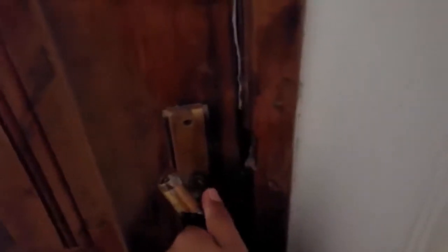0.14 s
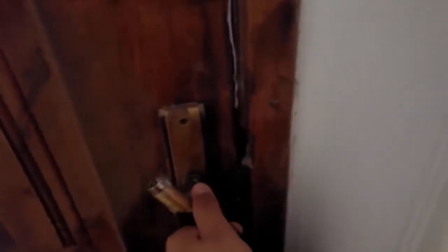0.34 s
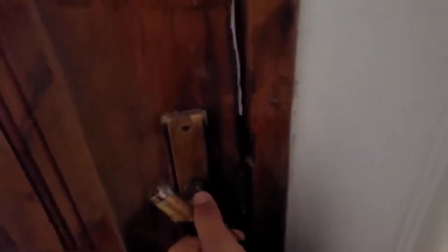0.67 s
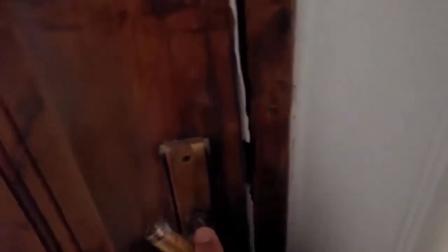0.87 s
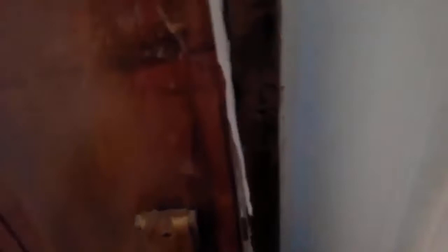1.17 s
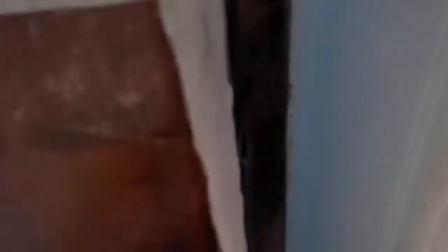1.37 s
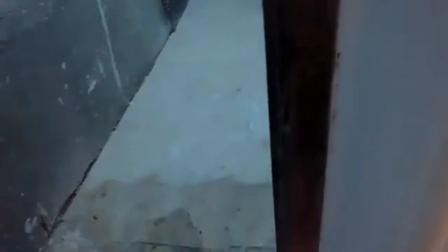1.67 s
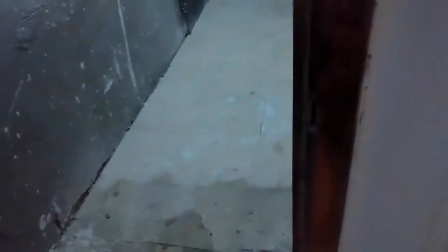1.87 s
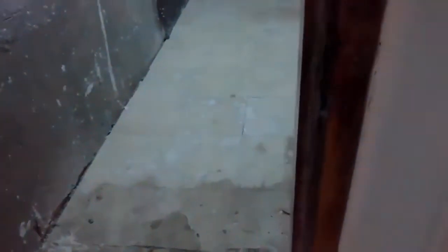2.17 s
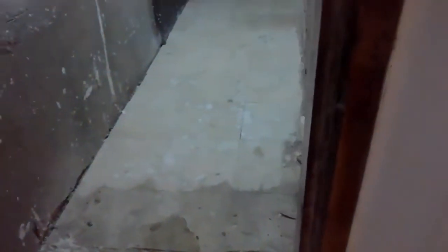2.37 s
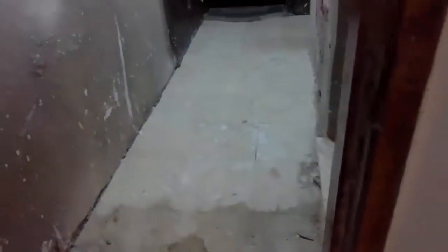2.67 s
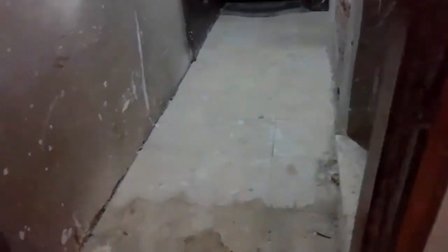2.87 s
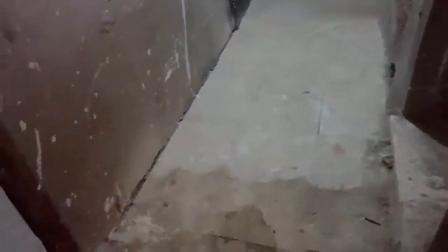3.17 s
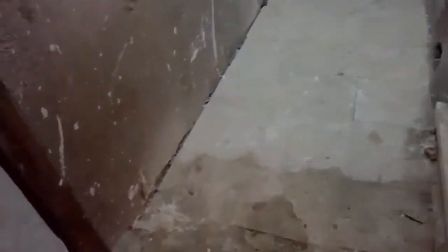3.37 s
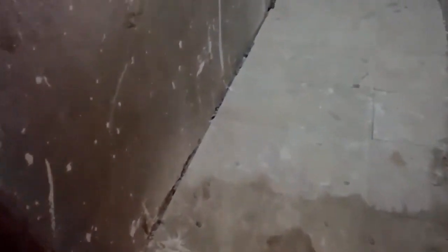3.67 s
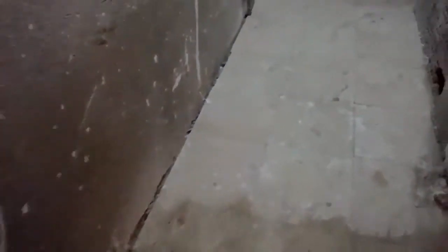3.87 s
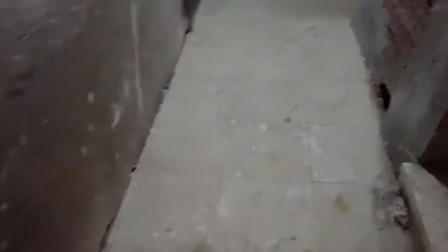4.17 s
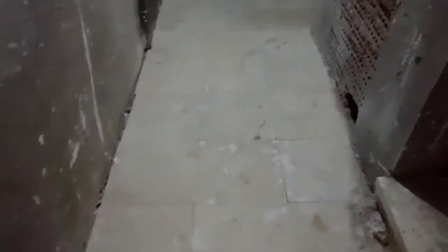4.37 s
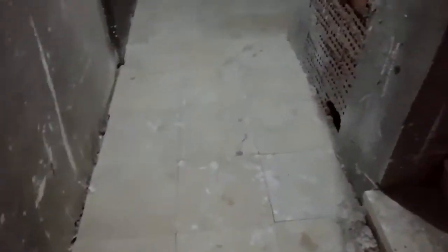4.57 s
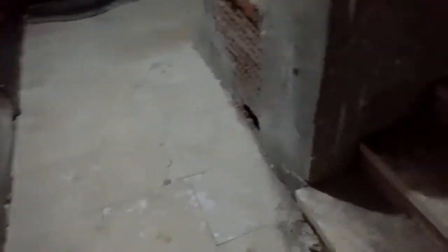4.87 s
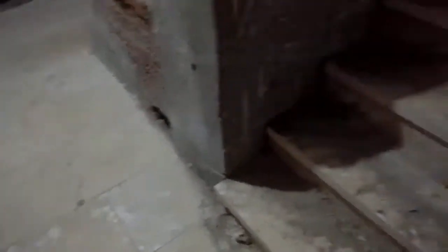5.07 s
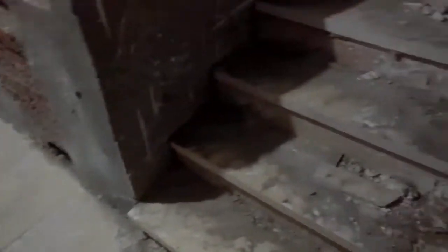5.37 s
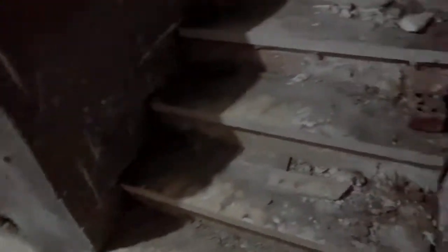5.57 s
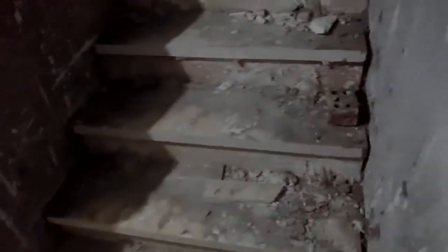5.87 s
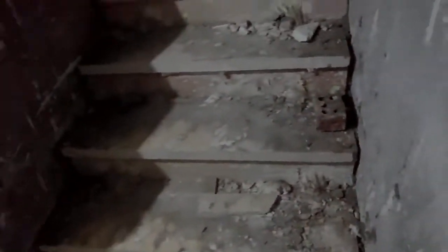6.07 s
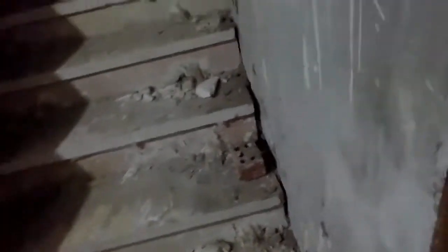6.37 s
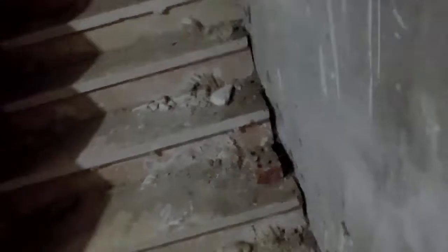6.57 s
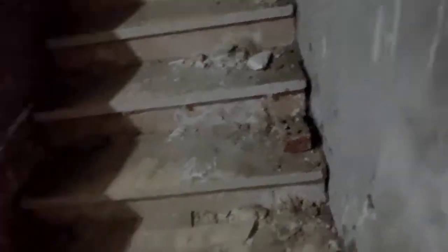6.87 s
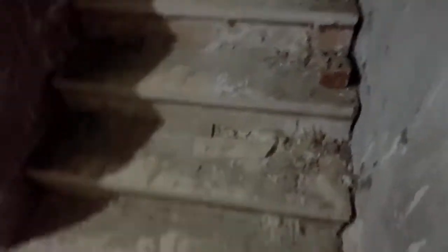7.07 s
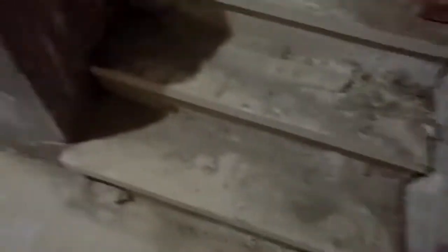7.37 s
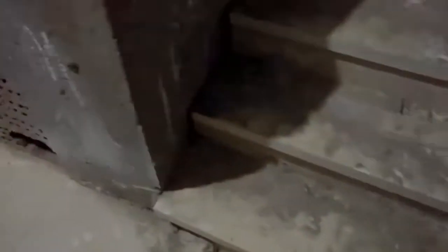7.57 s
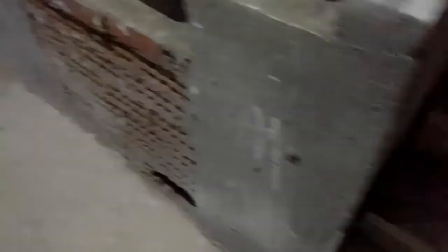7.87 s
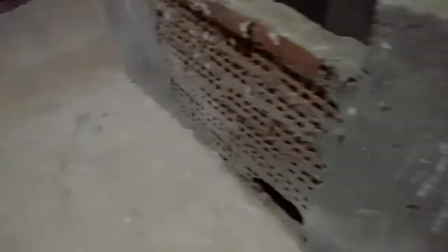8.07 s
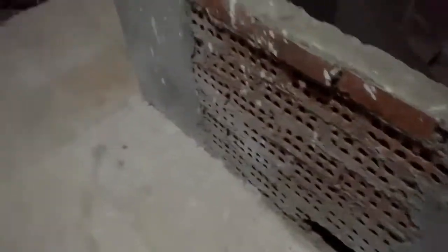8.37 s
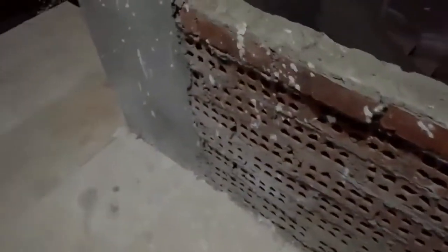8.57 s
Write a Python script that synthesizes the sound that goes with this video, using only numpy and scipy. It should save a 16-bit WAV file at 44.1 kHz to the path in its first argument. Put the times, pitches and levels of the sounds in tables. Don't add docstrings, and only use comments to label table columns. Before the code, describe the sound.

Quiet handling and latch clicks at a wooden door, a bolt springing free, faint gritty footsteps, then one violent slam booming through a concrete stairwell.

```python
import sys
import numpy as np
from scipy import signal
from scipy.fft import rfft, irfft, next_fast_len
from scipy.io import wavfile
from scipy.ndimage import uniform_filter1d

SR = 44100
rng = np.random.default_rng(int(sys.argv[2]) if len(sys.argv) > 2 else 0)


def put_to_file(sound):
    columns = np.atleast_2d(sound).T
    safe = np.clip(columns, -1, 1)
    whole_steps = np.round(safe * 32767)
    wavfile.write(sys.argv[1], SR, whole_steps.astype(np.int16))


def decibels_to_gain(level_db):
    exponent = np.asarray(level_db, float) / 20
    return 10 ** exponent


N = 384852

# pitch [Hz], level [dB], t60 [s].
KNOCK = [(679.6, -6.5, .04), (900, 1.5, .03), (1100, 2.5, 0.027), (1270, 2.5, 0.018), (1460, -3.5, 0.03),
         (1720, -8.5, 0.037)]
DUCK_DB, DUCK_S = -8.5, 6.5


def evened(x):
    return x / np.sqrt(np.mean(x ** 2) + 1e-20)


def read(points, hz):
    f, value = np.transpose(points)
    return np.interp(np.log(hz + 1), np.log(f + 1), value)


def follow(rows, t):
    s, db = np.transpose(rows)
    return np.interp(t, s, db)


def add(mix, s, sound):
    part = mix[..., round(s * SR):][..., :sound.shape[-1]]
    part += sound[..., :part.shape[-1]]


def coloured(x, gain):
    size = next_fast_len(x.shape[-1])
    spectrum = rfft(x, size) * gain(np.fft.rfftfreq(size, 1 / SR))
    return irfft(spectrum, size)[..., :x.shape[-1]]


def arch(t, start, hold, rise, fall):
    return -rise * np.maximum(start - t, 0) - fall * np.maximum(t - start - hold, 0)


def summed(levels_db):
    return 10 * np.log10(sum(decibels_to_gain(db) ** 2 for db in levels_db))


def ring(modes, length_s, rise_s=.002):
    t = np.arange(round(length_s * SR)) / SR
    sines = sum(decibels_to_gain(db - 60 * t / t60) * np.sin(2 * np.pi * hz * t) for hz, db, t60 in modes)
    return (1 - np.exp(-t / rise_s)) * sines


def shifted(modes, spread):
    moves = rng.standard_normal((len(modes), 2))
    return [(hz * (1 + spread * a), db + 2.0 * b, t60) for (hz, db, t60), (a, b) in zip(modes, moves)]


def resonate(x, hz, width_hz):
    turn = np.exp(2j * np.pi * np.cumsum(hz) / SR)
    r = np.exp(-np.pi * width_hz / SR)
    return 2 * (turn * signal.lfilter([1 - r], [1, -r], x / turn)).real


def echoes(decay, length_s):
    size = round(length_s * SR)
    taps = rng.choice([-1., 1.], (2, size)) * (rng.random((2, size)) < .08)
    hz, t, z = signal.stft(taps, SR, nperseg=256)
    tail = signal.istft(z * decibels_to_gain(-60 * t / read(decay, hz)[:, None]), SR, nperseg=256)[1]
    return tail / np.linalg.norm(tail, axis=1, keepdims=True)


def ports(pair, likeness, lean, lag_s):
    like = lambda hz: np.clip(read(likeness, hz), 0, 1)
    late = coloured(pair[0], lambda hz: like(hz) * np.exp(-2j * np.pi * hz * lag_s))
    right = late + coloured(pair[1], lambda hz: np.sqrt(1 - like(hz) ** 2))
    return np.array([coloured(pair[0], lambda hz: decibels_to_gain(read(lean, hz) / 2)),
                     coloured(right, lambda hz: decibels_to_gain(-read(lean, hz) / 2))])


def motor_hum():
    # time [s], second-order level [dB].
    motor_curve = [(0, -67), (.45, -71.5), (1.15, -66), (1.36, -60.5), (1.5, -63), (1.95, -52.5),
                   (2.3, -51.5), (2.45, -67), (3.05, -62.5), (3.55, -73.5), (3.68, -62.5), (4.05, -73),
                   (4.35, -56.5), (4.9, -67), (5.35, -68.5), (6.15, -70), (7.45, -67.5), (8.1, -81)]
    # multiple of shaft rate, level [dB from the fourth].
    upper_orders = [(3, -5), (5, -14), (6, -15), (8, -15)]
    # frequency [Hz], density [dB per Hz].
    rumble_colour = [(8.8, -39.5), (15, -11.5), (49, 0), (75, 0), (119, -12), (274, -18.5), (341, -22.5),
                     (500, -30.5), (650, -60), (1100, -120)]
    # start [s], hold [s], level [dB].
    low_swells = [
        (1.33, 0.068, -57),
        (1.97, .15, -54),
        (2.52, 0.073, -57),
        (3.28, 0.13, -64),
        (3.72, 0.16, -63),
        (7.0, 0.21, -56.5),
        (7.8, .2, -68.5),
        (8.5, .15, -68),
    ]
    # start [s], hold [s], level [dB].
    upper_swells = [
        (.66, 0.071, -74),
        (1.32, 0.053, -64),
        (1.9, 0.1, -66.5),
        (3.62, 0.43, -74),
        (4.2, 0.18, -65),
        (4.58, 0.196, -65.5),
        (5.0, 0.26, -72),
        (6.1, .1, -70),
        (7.0, 0.03, -63),
    ]
    t = np.arange(N) / SR
    steps = np.arange(N // 256 + 2) * 256 / SR

    def swelling(rows):
        level_db = summed([db + arch(steps, s, hold, 150, 80) for s, hold, db in rows])
        return np.interp(t, steps, level_db)

    second_db = follow(motor_curve, t)
    first_db = summed([-68.5 + .45 * (second_db + 64.5), swelling(low_swells)])
    fourth_db = summed([-78 + .5 * DUCK_DB * (t > DUCK_S), swelling(upper_swells)])
    orders = [(1, first_db), (2, second_db), (4, fourth_db)]
    orders += [(k, .5 * (fourth_db + 75.0) - 74.0 + db) for k, db in upper_orders]

    shaft_hz = 38 - .4 * t
    angle = 2 * np.pi * np.cumsum(shaft_hz) / SR
    lines = np.zeros(N)
    for k, db in orders:
        knots = rng.standard_normal(N // 2048 + 2)
        waver_db = 2.0 + 2.0 * np.interp(t, np.arange(len(knots)) * 2048 / SR, knots)
        lines += decibels_to_gain(db + waver_db) * np.sin(k * angle + k * k)
    rumble = evened(coloured(rng.standard_normal(N), lambda hz: decibels_to_gain(read(rumble_colour, hz))))
    return lines + decibels_to_gain(-68 + 0.65 * (second_db + 65.0)) * rumble


def scuff_power(hz, t):
    # start [s], hold [s], level [dB], dull rub [dB above level], fine grit [dB above level].
    hand = [
        (.07, 0.15, -57, -8, -6.5),
        (.28, 0.099, -62.5, -8, -5),
        (.65, 0.11, -53, -10.5, -1.5),
        (.79, .16, -57, -6, -2.5),
        (1.0, 0.217, -60.5, -15.5, -5.5),
        (1.3, 0.035, -52, -14, -12),
    ]
    swing = [
        (1.4, .21, -56, -22, -5.5),
        (1.7, 0.16, -54.5, -12.5, -2),
        (1.93, 0.44, -55, -23, -5),
        (2.46, 0.224, -57.5, -21.5, -4),
        (2.79, 0.11, -65.5, -14, -4),
    ]
    soles = [(3.04, .06, -64.5, -8.5, -1.5), (3.17, .13, -68.5, -4.5, -3), (3.56, .07, -73.5, -1, -0.5),
             (3.67, .06, -67, -6, 0.5), (3.8, .06, -69.5, -7, 3.5), (4.245, .085, -55.5, -9, -2),
             (4.38, .07, -56, -5.5, -5), (4.5, .1, -65, -29, -3.5), (4.88, .04, -66, -7, 2),
             (4.985, 0.045, -59, -3.5, -2), (5.07, 0.093, -66, -13, -5), (7.31, .14, -77, -13, 1),
             (7.45, .05, -68, -10, -1), (7.515, .055, -58.5, -10.5, -3), (7.6, 0.27, -64.5, -9, -3.5),
             (7.86, 0.202, -68.5, -9, -3), (8.1, 0.048, -64, -18, -2), (8.2, 0.051, -74.5, -9.5, -4.5),
             (8.31, .04, -80, -7, 6), (8.47, .02, -79.5, -13.5, -7), (8.66, .07, -80, -2, -1)]
    squeeze = [
        (5.22, .3, -73, -4, 9),
        (5.57, 0.36, -67, -6.5, 6),
        (5.97, .24, -69, -6.5, 5),
        (6.245, .055, -52.5, -3.5, 1),
    ]
    # start [s], hold [s], level [dB].
    fine_hiss = [(.35, .02, -70), (.7, .07, -57), (1.19, .03, -71), (1.73, .13, -67), (2.52, .09, -69),
                 (3.06, .07, -76), (3.26, .06, -82), (3.58, .16, -78), (4.86, .06, -77), (5.27, .26, -69),
                 (5.81, .08, -72), (6.14, .08, -76), (7.3, .12, -81), (7.43, .2, -74), (8.09, .07, -79)]
    bands = [[(600, 1), (1100, 0)],
             [(600, 0), (1100, 1), (2600, 1), (4200, 0)],
             [(2600, 0), (4200, 1), (7500, 1), (10500, 0)],
             [(7500, 0), (10500, 1)]]
    shares = np.array([read(band, hz) for band in bands])
    air_share = shares[3][:, None]

    def tilt(dull_db, grit_db, air_db):
        return (shares.T @ [dull_db + 11.0, 0, grit_db + 0.5, air_db + 8.5])[:, None]

    still_db = -74 + DUCK_DB * (t > DUCK_S)
    power = decibels_to_gain(tilt(-4, -6.5, -10.5)) ** 2 * decibels_to_gain(still_db) ** 2
    for strokes, rise, fall, air_db in [(hand, 140, 190, -7), (swing, 110, 72, -10),
                                        (soles, 230, 190, -7.5), (squeeze, 260, 90, -9)]:
        for s, hold, db, dull_db, grit_db in strokes:
            envelope = decibels_to_gain(db + arch(t, s, hold, rise, fall))
            power = power + decibels_to_gain(tilt(dull_db, grit_db, grit_db + air_db)) ** 2 * envelope ** 2
    for s, hold, db in fine_hiss:
        power += air_share ** 2 * decibels_to_gain(db + 11.0 + arch(t, s, hold, 400, 300)) ** 2
    return power, air_share


def scuff():
    # frequency [Hz], density [dB per Hz].
    scuff_colour = [(100, -33.5), (170, -3.5), (383, -10), (560, -7.5), (915, 0), (1040, -1.5), (1190, -1),
                    (1550, -4), (2310, -1), (2740, -2.5), (4920, -5), (8520, -11.5), (11500, -15),
                    (15600, -19.5)]
    grains = decibels_to_gain(4.4 * np.minimum(rng.exponential(1, N), 3.6)) * (rng.random(N) < 500 / SR)
    drive = rng.standard_normal((2, N)) * (1 + 0.11 * evened(uniform_filter1d(grains, 24)))
    hz, t, z = signal.stft(drive, SR, nperseg=512)
    power, air_share = scuff_power(hz, t)

    noise = lambda: rng.standard_normal(z.shape[1:])
    patches = evened(uniform_filter1d(uniform_filter1d(noise(), 8, 0), 5, 1))
    flicker = evened(uniform_filter1d(noise(), 90, 0))
    sparkle = evened(uniform_filter1d(noise(), 6, 1))
    level_db = 10 * np.log10(power) + 2.0 * patches + 1.2 * flicker + 1.5 * sparkle
    gate_db = -73
    level_db += .35 * air_share * np.minimum(uniform_filter1d(level_db, 12, 0) - gate_db, 0)

    shape = decibels_to_gain(read(scuff_colour, hz))
    shape /= np.sqrt(np.sum(shape[(hz > 900) & (hz < 3000)] ** 2) / len(hz))
    out = signal.istft(z * shape[:, None] * decibels_to_gain(level_db), SR, nperseg=512)[1][:, :N]
    return out * np.interp(np.arange(N) / SR, [6.3, 6.35, 6.45, 6.55], [1, 0, 0, 1])


def grit_snaps():
    # time [s], peak [dB].
    grit_rows = [(0.0324, -55), (0.1524, -50), (0.2024, -51), (0.2797, -49), (0.5256, -62), (0.9217, -45),
                 (0.9544, -51), (1.038, -54), (3.3138, -59), (3.413, -62), (3.444, -65), (3.5941, -57),
                 (4.1439, -62), (4.9654, -49), (5.1835, -52), (7.0292, -77), (7.3075, -62), (7.3562, -57),
                 (7.3644, -59), (7.3918, -54), (7.4068, -51), (7.4771, -50), (7.775, -57), (7.96, -58),
                 (8.204, -59), (8.2843, -62), (8.2993, -58), (8.3073, -57), (8.3404, -63)]
    out, t = np.zeros(N), np.arange(600) / SR
    for s, db in grit_rows:
        snap = rng.standard_normal(601)
        add(out, s, decibels_to_gain(db + 1.5) * (snap[1:] - .6 * snap[:-1]) * decibels_to_gain(-60 * t / .005))
    return out


def latch_ticks():
    # time [s], peak [dB], ring [Hz], low knock [dB].
    tick_rows = [(0.0665, -42, 3310, -53), (0.0942, -45, 2930, -46), (0.134, -47, 3550, -47),
                 (0.2546, -49, 3070, -52), (0.3105, -47, 3770, -69), (0.357, -45, 2830, -50),
                 (0.5845, -44.5, 6300, -73), (0.597, -48, 3670, -70), (0.633, -46, 2620, -71),
                 (0.691, -40, 4000, -69), (0.706, -39, 4100, -61), (0.724, -39, 4350, -66),
                 (0.8092, -46, 3300, -55), (0.836, -39.5, 2600, -64), (0.8758, -43.5, 3230, -44),
                 (0.94, -41, 4700, -42.5), (3.0396, -52.5, 2660, -60), (3.695, -49, 6030, -71),
                 (3.8317, -47.5, 4170, -62), (4.4023, -45, 3540, -53), (4.414, -42, 3540, -70),
                 (4.9776, -46, 5270, -40), (7.5494, -49, 4293, -45), (8.107, -51, 3870, -76)]
    out, t = np.zeros(N), np.arange(600) / SR
    for s, db, hz, knock_db in tick_rows:
        snap = rng.standard_normal(600) * decibels_to_gain(-60 * t / 0.0098)
        metal = ring([(hz, 0, .008), (0.92 * hz, -3, .006)], 600 / SR, 0.00014)
        add(out, s, decibels_to_gain(db) * (snap + 0.54 * metal))
        add(out, s, decibels_to_gain(knock_db - 7.0) * ring(shifted(KNOCK, 0.065), .05, 0.00091))
    return out


def whistles():
    # start [s], hold [s], level
    # [dB], first pitch [Hz], width [Hz].
    note_rows = [(0.459, 0.06, -68, 207, 70), (.72, 0.16, -68, 242, 50), (4.982, .03, -55.5, 820, 350),
                 (5.0, .04, -61, 1250, 300), (5.06, .07, -68, 1400, 200), (4.875, .06, -66, 1150, 300),
                 (1.395, 0.02, -53.5, 1150, 130), (1.43, 0.023, -57, 1164, 130),
                 (1.431, 0.027, -66, 2280, 250), (2.62, .28, -68, 2320, 150),
                 (2.78, 0.34, -68.5, 1234, 200), (3.031, 0.044, -68, 2690, 150),
                 (4.2, 0.2, -65, 2000, 200), (4.14, .05, -71, 2060, 200), (4.568, .03, -67, 1720, 180),
                 (5.18, .015, -64, 7900, 1500), (5.266, 0.13, -57.5, 8700, 890),
                 (5.314, 0.11, -58.5, 7360, 1300), (5.42, .04, -59, 8300, 1800),
                 (5.53, 0.072, -62, 5800, 1200), (5.42, 0.09, -59.5, 4260, 380),
                 (5.521, 0.086, -58, 4080, 380), (5.66, 0.042, -67, 4100, 330),
                 (5.554, 0.056, -58, 1960, 100), (5.621, 0.12, -60, 2015, 260),
                 (5.761, 0.29, -64.5, 2060, 220), (6.085, 0.06, -68, 1935, 60),
                 (5.63, 0.09, -58, 2300, 160),
                 (7.621, .5, -71, 1300, 500), (5.66, .02, -66, 300, 50), (5.715, 0.035, -57, 295, 30),
                 (5.808, 0.046, -58, 313, 30), (5.89, 0.07, -60, 315, 35), (6.01, .03, -61, 310, 30),
                 (6.07, 0.1, -59, 313, 25), (6.249, .03, -55.5, 320, 60), (6.245, .03, -58.5, 1000, 250),
                 (6.619, .17, -82, 4000, 600), (1.332, .07, -62, 2700, 200), (3.35, 0.17, -76, 1140, 200),
                 (3.901, .15, -75, 1160, 150), (5.72, 0.19, -69, 190, 60), (5.804, 0.47, -68, 700, 200),
                 (7.616, 0.098, -73.5, 372, 50), (8.55, .12, -76, 190, 70)]
    out = np.zeros((2, N))
    for s, hold, db, first_hz, width_hz in note_rows:
        t = np.arange(SR // 2) / SR + s - .05
        sink_hz_per_s = 60 * (first_hz / 1000) ** 2
        hz = first_hz - sink_hz_per_s * np.clip(t - s, 0, hold)
        air = [evened(resonate(resonate(n, hz, width_hz), hz, width_hz))
               for n in rng.standard_normal((2, len(t)))]
        add(out, t[0], decibels_to_gain(db + arch(t, s, hold, 700, 130)) * np.array(air))
    return out


def bolt_release():
    # time [s], metal [dB], wood [dB].
    release_rows = [
        (1.272, -51, -60),
        (1.283, -50, -58),
        (1.2901, -37, -47),
        (1.2935, -39, -47),
        (1.297, -39, -42),
        (1.302, -38, -45),
        (1.311, -40, -36),
        (1.32, -46, -41),
    ]
    # pitch [Hz], level [dB], t60 [s].
    bolt_modes = [(2050, -1, 0.018), (2700, 3, 0.018), (3150, -0.5, 0.011), (3750, -3, 0.016),
                  (4640, -2.5, 0.01), (5620, -1, 0.011), (6600, -9, 0.011), (8350, -2, .008)]
    out = np.zeros(N)
    for s, metal_db, wood_db in release_rows:
        add(out, s, decibels_to_gain(metal_db) * ring(shifted(bolt_modes, 0.03), .1, 0.00074))
        add(out, s, decibels_to_gain(wood_db + 1.5) * ring(KNOCK, .1, 0.0024))
    return out


def thuds():
    # time [s], thud [dB], knock [dB].
    thud_rows = [
        (1.299, -49, -41),
        (1.338, -44.5, -56),
        (4.257, -54, -62),
        (4.42, -58, -49),
        (4.977, -56, -44),
        (7.551, -61, -60),
        (7.66, -73, -70),
    ]
    # pitch [Hz], level [dB], t60 [s].
    thump_modes = [(150, 0, .1), (185, 0, .09), (235, 0, .08), (300, -5, .06), (420, -5, .06)]
    # pitch [Hz], level [dB], t60 [s].
    heel_modes = [(640, -52, .03), (790, -47, .04), (930, -48, .035)]
    out = np.zeros(N)
    for s, thud_db, knock_db in thud_rows:
        add(out, s, decibels_to_gain(thud_db - 1.0) * ring(shifted(thump_modes, 0.06), .2, 0.0077))
        add(out, s, decibels_to_gain(knock_db - 7.0) * ring(shifted(KNOCK, 0.13), .2, 0.0036))
    add(out, 4.9765, ring(heel_modes, .1, .001))
    return out


def door_blows():
    # time [s], crack [dB], panel [dB], knock [dB].
    blow_rows = [(6.2866, -30, -55, -23), (6.296, -22, -48, -22), (6.304, -25, -42, -27),
                 (6.316, -22, -30, -17), (6.328, -16.5, -22, -14), (6.3655, -21.5, -11.5, -17.5),
                 (6.372, -25.5, -7, -16), (6.379, -26, -16, -23), (6.394, -22, -26.5, -26),
                 (6.4186, -27.5, -22.5, -8.5), (6.429, -36.5, -15, -16), (6.446, -36, -18, -18),
                 (6.458, -43, -16.5, -29.5), (6.486, -46, -18.5, -35)]
    # frequency [Hz], density [dB per Hz].
    crack_colour = [(180, -27), (300, -2), (469, -11), (509, -0.5), (745, -6.5), (1130, -5), (1400, -12),
                    (1980, -8), (2530, -15.5), (2990, -15), (15600, -37)]
    # pitch [Hz], level [dB], t60 [s].
    panel_modes = [(166.5, 2.5, 0.052), (223.6, -1.5, 0.073), (265.4, -5.5, 0.12), (333, -1.5, 0.063),
                   (412, -5.5, 0.1), (512, -0.5, 0.065), (600, -4, .045)]
    door, knocks, t = np.zeros((2, N)), np.zeros(N), np.arange(3000) / SR
    for s, crack_db, panel_db, knock_db in blow_rows:
        burst = rng.standard_normal((2, 3000)) * decibels_to_gain(-60 * t / 0.078) * (1 - np.exp(-t / .0015))
        add(door, s, decibels_to_gain(crack_db + 8) * coloured(burst, lambda hz: decibels_to_gain(read(crack_colour, hz) + 14)))
        add(door, s, decibels_to_gain(panel_db) * ring(panel_modes, .3, .003))
        add(knocks, s, decibels_to_gain(knock_db - 4.5) * ring(shifted(KNOCK, 0.03), .3, .0008))
    return door, knocks


def stairwell_boom():
    # time [s], deep boom [dB], upper drone [dB], air push [dB].
    pump_rows = [
        (6.3666, -16.5, -12.5, -15),
        (6.385, -30.5, -19.5, -36.5),
        (6.441, -20, -26.5, -36),
        (6.486, -29.5, -24.5, -35.5),
    ]
    # pitch [Hz], level [dB], t60 [s].
    boom_modes = [(55, -4, 2), (56.6, -3.5, 0.54), (86, 0.5, 0.68), (96.96, -4, .42)]
    drone_modes = [(108, -19, .55), (124, -18, 0.6), (143.3, -8, .6), (153.8, -6, .6), (160.9, -3, 0.64),
                   (172.3, -7, .55), (188, -10, .8), (202, -12, 1), (226, -11, .55), (247, -16, .6),
                   (269, -16, 0.72), (300, -24, .5), (337, -24, 0.5)]
    leaf_modes = [(163, 0, 0.077)]
    # time [s], level [dB].
    flex_rows = [
        (6.303, -18),
        (6.311, -8.5),
        (6.318, -4.5),
    ]
    boom = np.zeros(N)
    for s, boom_db, drone_db, push_db in pump_rows:
        add(boom, s, decibels_to_gain(drone_db) * ring(drone_modes, 1.6, .006))
        add(boom, s, decibels_to_gain(boom_db) * ring(boom_modes, 1.6, 0.0033))
        add(boom, s, -decibels_to_gain(push_db) * ring([(30, 0.0031, .15)], 1.6, .006))
    add(boom, 6.604, decibels_to_gain(-25) * ring(boom_modes[:1], 1.6, .02))
    for s, db in flex_rows:
        add(boom, s, decibels_to_gain(db) * ring(leaf_modes, 0.33, 0.0036))
    return boom


def slam():
    # frequency [Hz], t60 [s].
    stairwell_decay = [(100, 1.7), (250, 0.62), (500, 0.61), (1100, 0.84), (1500, .74), (1950, 0.62),
                       (3000, 0.53), (12000, .46)]
    # frequency [Hz], level [dB].
    wet = [(150, -6), (400, -7.5), (800, -2), (1350, -4), (2500, -5), (12000, -8.5)]
    # time [s], gain [dB].
    shut_curve = [
        (6.6, 1.5),
        (6.8, -1),
        (6.88, -4.5),
        (6.93, -11),
        (7.15, -19),
        (7.5, -37),
    ]
    # frequency [Hz], likeness [0 to 1].
    slam_likeness = [(60, 0.98), (200, .93), (350, .6), (550, .2), (1200, 0.56), (2500, .25), (8000, .18)]
    # frequency [Hz], left minus right [dB].
    slam_lean = [(60, -1.5), (180, 2), (550, -2), (1650, 2), (4970, 5.5), (15000, 6)]
    door, knocks = door_blows()
    boom = stairwell_boom()
    start = round(6.2 * SR)
    to_walls = (door + decibels_to_gain(-13.5) * knocks + decibels_to_gain(-13.5) * boom)[:, start:start + SR]
    room = np.zeros((2, N))
    add(room, start / SR, signal.fftconvolve(to_walls, echoes(stairwell_decay, 1.2), axes=1))
    room = coloured(room, lambda hz: decibels_to_gain(read(wet, hz)))
    shut = decibels_to_gain(follow(shut_curve, np.arange(N) / SR))
    return -shut * (ports(door + knocks + room, slam_likeness, slam_lean, .00069) + boom)


def latch_rattle():
    # time [s], peak [dB], ring [Hz].
    rattle_rows = [
        (6.551, -48.5, 3300),
        (6.5588, -37, 3280),
        (6.5678, -38.5, 4960),
        (6.595, -50.5, 2507),
        (6.6315, -46, 6700),
        (6.701, -52, 4480),
        (6.724, -62, 3510),
        (6.752, -62, 2600),
        (6.9468, -71.5, 2980),
    ]
    # pitch [Hz], level [dB], t60 [s].
    latch_modes = [(3360, -4, .01), (4140, -1.5, 0.014), (4970, -15, .01), (6670, -1, 0.007),
                   (8000, -5, 0.007)]
    out, t = np.zeros(N), np.arange(600) / SR
    for s, db, hz in rattle_rows:
        snap = rng.standard_normal(600) * decibels_to_gain(-60 * t / 0.0086)
        add(out, s, decibels_to_gain(db - 4.5) * (ring([(hz, -3, .012)], 600 / SR, 0.0003) + 1.1 * snap))
        add(out, s, decibels_to_gain(db - 2.5) * ring(latch_modes, .4, .00025))
        add(out, s, decibels_to_gain(db + 2.5) * ring(shifted(KNOCK, 0.064), .4, .001))
    return out


def clicks():
    # frequency [Hz], gain [dB].
    tick_colour = [(500, -1), (2000, -1), (5000, 1), (9000, -8), (13000, -5), (16000, -22)]
    metal = latch_ticks() + bolt_release() + latch_rattle()
    dry = coloured(metal, lambda hz: decibels_to_gain(read(tick_colour, hz))) + thuds()
    near_echoes = echoes([(500, 0.2), (3000, 0.13), (9000, 0.067)], .3)
    near = signal.oaconvolve(dry[None], near_echoes, axes=1)[:, :N]
    return np.array([dry + grit_snaps() + decibels_to_gain(0.5) * near[0], near[1]])


def scene():
    # frequency [Hz], likeness [0 to 1].
    likeness = [(60, 0.96), (200, 0.54), (500, .45), (1200, 0.51), (2500, 0.25), (8000, 0.18)]
    # frequency [Hz], left minus right [dB].
    lean = [(60, -4.5), (150, -1), (380, 1), (950, 5.5), (2380, 0.5), (5980, 11), (15000, 8.5)]
    quiet = scuff() + whistles() + clicks()
    return motor_hum() + ports(quiet, likeness, lean, .00056) + slam()


def band_limit(x):
    return signal.sosfilt(signal.butter(12, 15760, fs=SR, output="sos"), x)


def record(dry):
    limited = .95 * np.tanh(dry / .95)
    mix = coloured(limited, lambda hz: hz < 15720)
    return band_limit(mix)


dry = scene()
out = record(dry)
put_to_file(out)
```